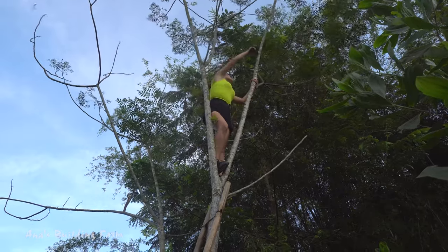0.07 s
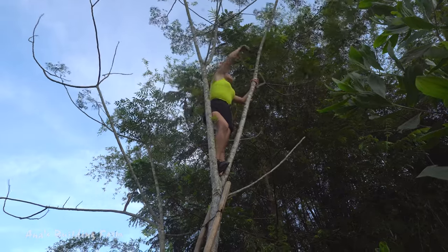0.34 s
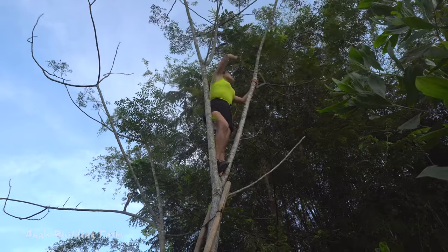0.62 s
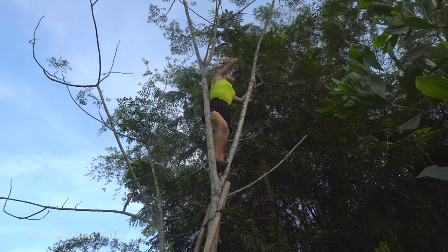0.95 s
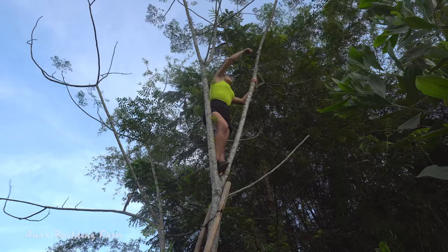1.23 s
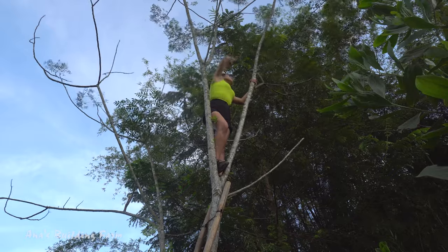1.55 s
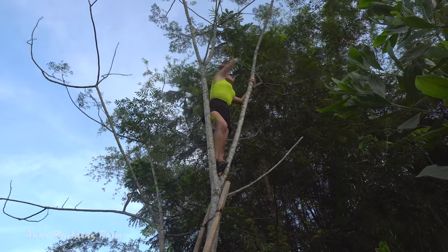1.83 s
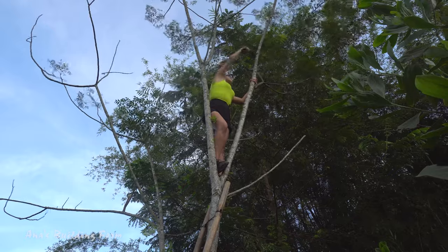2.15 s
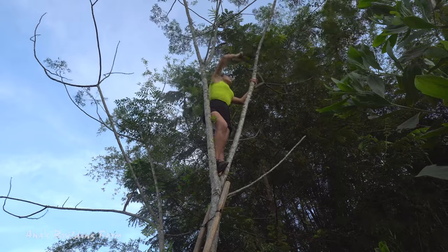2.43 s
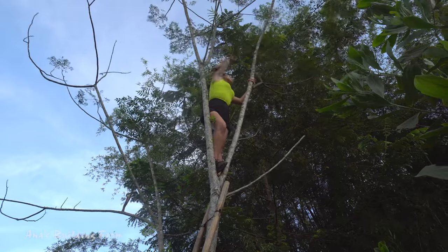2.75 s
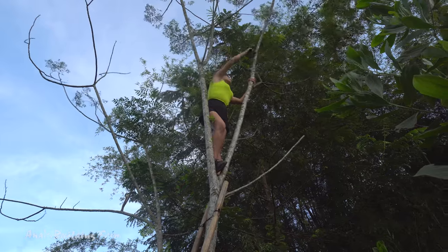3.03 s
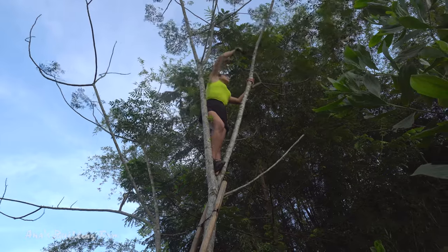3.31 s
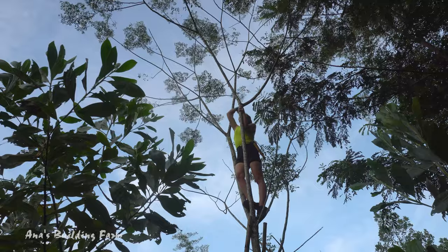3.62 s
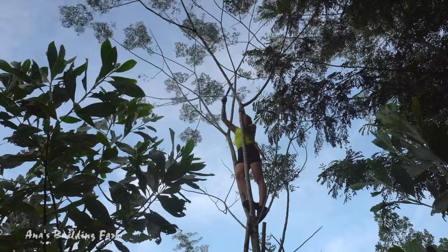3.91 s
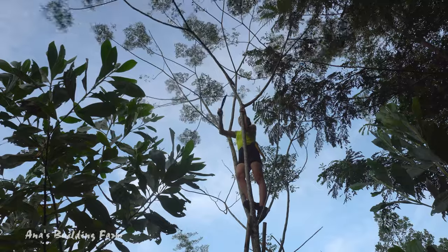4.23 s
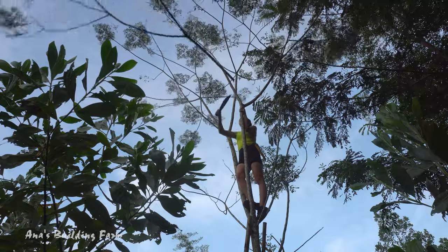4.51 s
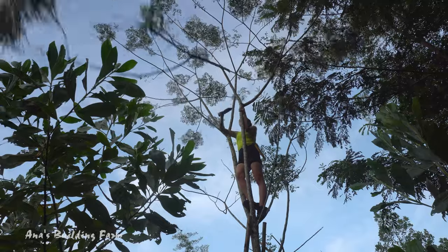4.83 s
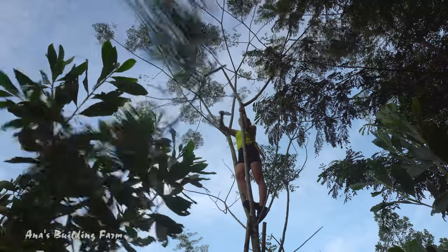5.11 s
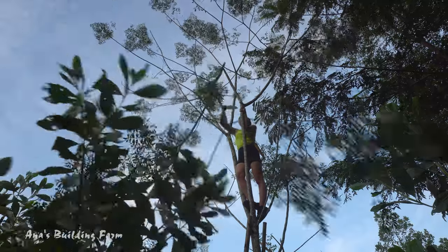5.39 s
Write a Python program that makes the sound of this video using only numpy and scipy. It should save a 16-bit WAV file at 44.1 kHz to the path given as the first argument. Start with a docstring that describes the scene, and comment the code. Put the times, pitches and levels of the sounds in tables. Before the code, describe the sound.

Four machete chops hit a tree, a goat bleats, then a limb cracks and crashes through leaves, with crickets singing throughout.

```python
"""Machete felling a tree limb

Four blows up a tree ring the trunk's modes and shake the leaves. The limb cracks as its fibres give,
crashes through the foliage snapping twigs, and creaks by stick-slip. A goat bleats twice: quavering
harmonics shaped by its throat. Crickets sing throughout; the surrounding trees return a soft echo."""
import sys
import numpy as np
from scipy import signal
from scipy.fft import rfft, irfft
from scipy.io import wavfile
from scipy.ndimage import uniform_filter1d

SR = 44100
rng = np.random.default_rng(int(sys.argv[2]) if len(sys.argv) > 2 else 0)


def master(y):
    """Save y as 16-bit WAV."""
    cut = np.clip(np.atleast_2d(y).T, -1, 1)
    pcm = np.round(cut * 32767)  # scale
    wavfile.write(sys.argv[1], SR, pcm.astype(np.int16))


N = 244755
TIME = np.arange(N) / SR

# blade blows: t/s, thud/dB, hollow knock/dB, hard knock/dB, bite/dB, crack/dB, leaves/dB,
# f/Hz of the mode struck at its node
BLOWS = [(0.1228, -20.5, -22, -15, -18, -16.5, -39, 600), (1.1139, -25, -24.5, -19, -16.5, -23, -41.5, 827),
         (1.9873, -23, -25.5, -16.5, -12.5, -26.5, -40, 694),
         (3.0033, -23, -17.5, -12, -14.5, -26, -41, 435)]


def chopping():
    """The blade bites with a crack, the trunk knocks, the crown shivers."""
    # shaken leaves: f/Hz, level/dB
    shiver_spectrum = [(200, -1.5), (700, -1), (2000, -0.5), (4000, -2.5), (7000, -4), (11000, 0.5),
                       (16000, -5.5)]
    out, shake, t = np.zeros((2, N)), np.zeros(N), TIME[:SR // 8]
    for at_s, thud_db, hollow_db, hard_db, bite_db, crack_db, leaf_db, node_hz in BLOWS:
        blow = [(220, thud_db), (420, hollow_db), (640, hard_db), (850, hard_db), (1400, bite_db)]
        add(out, at_s, trunk(blow, node_hz))
        crack = band(noise(0.8, len(t)), 1500, 5500) + undb(-7) * band(noise(0.21, len(t)), 7400, 13800)
        add(out, at_s + 0.001505, pan(undb(crack_db) * unit(crack) * fade(t, 0.0012, 0.0036), -1.8))
        shake += undb(leaf_db) * fade(TIME - at_s, 0.011, 0.27)
    echo = undb(-15.5) * woods(band(out, 330, 12000), t60_s=0.28, top_hz=9500)
    shiver = shake * leaves(shiver_spectrum, side=0.5, rate_hz=2500, scatter_db=5.7)
    return pan(out + echo, -0.6) + pan(shiver, -3.5)


def trunk(blow_spectrum, node_hz):
    """Bending waves run down the trunk, low ones slowest; a mode struck at its node is weak."""
    # trunk modes: f/Hz, level/dB, t60/s (capped below)
    modes = [(55.7, -15.5, 0.53), (80.5, -6.5, 0.68), (92.5, -7.5, 0.35), (116.6, -15, 0.15),
             (149.9, -5.5, 0.21), (180, -8.5, 0.39), (235.4, 0, 0.12), (406.5, -3, 0.14), (486, -4, 0.067),
             (608, 2.5, 0.05), (691, -1.5, 0.058), (806, -3.5, 0.075), (1015, -4.5, 0.035),
             (1226, 1, 0.017), (1470, -8.5, 0.034), (1669, 1.5, 0.027), (2004, -0.5, 0.032),
             (2320, -12, 0.058), (2695, -17, 0.114)]
    out, t = np.zeros((2, SR // 2)), TIME[:SR // 2]
    travel_s = lambda hz: max(0.1937 / np.sqrt(hz) - 0.0042, 0)
    node_db = lambda hz: -9 * np.exp(-(np.log(hz / node_hz) / 0.11) ** 2)
    drive = lambda hz: gain_at(hz, blow_spectrum) * undb(node_db(hz))
    for hz, db, t60_s in modes:
        detune, phase = 1 + 0.02 * rng.standard_normal(), 2 * np.pi * rng.random()
        envelope = fade(t - travel_s(hz), 0.00026 + 0.74 / hz, min(t60_s, 0.3) / np.log(1000))
        out += undb(db - 3) * drive(hz) * np.sin(2 * np.pi * hz * detune * t + phase) * envelope
    for hz in 90 * 2 ** (np.arange(11) / 2):  # dense weak modes as noise bands
        wood = unit(band(noise(0.099, len(t)), hz / 1.217, hz * 1.27))
        envelope = fade(t - travel_s(hz), 0.0019, 0.01 * (700 / hz) ** 0.6)
        out += undb(-12.5) * drive(hz) * wood * envelope
    return out


def breaking():
    """Fibre bundles give in bursts that ring the limb; the main break jolts the trunk."""
    # limb cracks: t/s, level/dB, decay/s, f/Hz
    cracks = [(0.364, -32.5, 0.0034, 2420), (0.676, -33, 0.0016, 1500), (1.569, -35, .0007, 2880),
              (2.155, -31.5, 0.0014, 2880), (2.289, -38.5, 0.0044, 1920), (3.789, -29, .0013, 2460),
              (3.8253, -16.5, 0.0036, 2470), (3.8576, -14, 0.00478, 2360), (3.957, -24, 0.0036, 3200),
              (4.057, -31, 0.0032, 2970), (4.2114, -13.5, 0.0032, 3536), (4.2559, -20.5, 0.00325, 3230),
              (4.618, -14, 0.00199, 2800), (4.7849, -24.5, .002, 2800), (4.7911, -28, 0.0017, 5500),
              (4.82, -26, .0032, 2200), (5.0543, -17, 0.0047, 1850)]
    # limb modes: f/Hz, level/dB
    modes = [(1860, 2), (2700, -4.5), (3170, -13), (3960, -9), (4400, 4.5)]
    out, t = np.zeros((2, N)), TIME[:SR // 8]
    click = band(signal.unit_impulse(len(t), idx=SR // 1000), 4500, 16000)
    for at_s, db, fall_s, hz in cracks:
        splinter_db = -6 + 8.5 * np.log2(hz / 2750)  # higher cracks splinter more
        body = unit(band(noise(0.32, len(t)), hz / 1.65, hz * 1.492))
        splinters = undb(splinter_db) * unit(band(noise(0.33, len(t)), 3300, 11800))
        fibres = unit(undb(11.3 * uniform_filter1d(rng.standard_normal(len(t)), size=12)))
        ring = 0
        for mode_hz, mode_db in modes:
            coupling = np.exp(-(np.log(mode_hz / hz) / 0.5) ** 2)
            ring += undb(mode_db) * coupling * np.sin(2 * np.pi * (mode_hz * t + rng.random()))
        ring *= undb(-4.5) * fade(t, 0.000276, 0.0026)
        echo = unit(band(noise(0.213, len(t)), hz / 3.25, hz * 1.64))
        echo *= undb(-11.5) * fade(t, 0.0022, 0.0083)
        burst = (body + splinters) * fibres * fade(t, 0.00062, fall_s)
        add(out, at_s, undb(db) * (burst + ring + echo + undb(splinter_db + 17.5) * click))
    out = pan(out + undb(-12.5) * woods(out, t60_s=0.76, top_hz=13000), -2.6)
    add(out, 3.858, trunk([(90, -31.5), (400, -39), (900, -39), (1500, -39)], node_hz=160))
    return out


def twigs():
    """Each snap or slip of wood is one hard click and a tiny rattle."""
    # loudest snaps: t/s, level/dB, f/Hz
    loud_snaps = [(0.605, -31, 2180), (1.306, -25, 2200), (2.253, -24.5, 2100), (3.697, -23, 3300),
                  (3.742, -22.5, 3120), (3.8033, -13, 2940), (4.0099, -14, 2990), (4.018, -11, 2940),
                  (4.1737, -22, 3200), (4.3316, -15.5, 2920), (4.351, -11.5, 3016), (4.3733, -21, 3450),
                  (4.4581, -21, 3280), (5.0445, -7, 2760), (5.0722, -9, 6300), (5.1585, -11, 2800),
                  (5.3438, -9.5, 2500), (5.4062, -8, 2650), (5.5217, -9.5, 2520)]
    # snap spectrum: f/pitch, level/dB
    snap_spectrum = [(.1, -18.5), (.7, 0.5), (1, 10.5), (1.3, 4), (1.6, 7.5), (2.2, -4), (3.6, -3),
                     (5.8, -17.5)]
    out, t = np.zeros((2, N)), TIME[:SR // 32]
    debris = []  # bits drop after each blow
    for at_s, *_ in BLOWS:
        debris += scatter(at_s + 0.21, at_s + 0.45, db=-35, hz=2200, count=2)
    slips = creak(start_s=5.1752, db=-9, hz=2750, count=8)
    sag = scatter(3.75, 4, db=-24, hz=3150, count=8)  # twigs give as the limb sags
    for at_s, db, hz in list(loud_snaps) + slips + debris + sag:
        snap = undb(-10.5) * noise(0.43, len(t)) * fade(t - 0.001, 0.000587, 0.00073)
        snap[:, SR // 1000] += 1
        snap = colour(snap, [(hz * ratio, gain_db) for ratio, gain_db in snap_spectrum])
        add(out, at_s - 0.0005, undb(db - 3) * snap / np.abs(snap).max())
    return out + undb(-8.5) * woods(out, t60_s=0.32, top_hz=16000)


def scatter(start_s, end_s, db, hz, count):
    """Uneven snaps strewn over a span; rows of t/s, level/dB, f/Hz."""
    return [(start_s + (end_s - start_s) * (k + rng.random()) / count,
             db + 1.5 * rng.standard_normal(),
             hz * 2 ** rng.uniform(-0.25, 0.132)) for k in range(count)]


def creak(start_s, db, hz, count):
    """The fallen limb sticks and slips, slowing to an even pace; rows of t/s, level/dB, f/Hz."""
    gaps_s = np.minimum(0.0085 * 1.32 ** np.arange(count - 1), 0.0194)
    return [(at_s, db + rng.standard_normal(), hz) for at_s in start_s + np.append(0, np.cumsum(gaps_s))]


def falling():
    """The limb drops through foliage in lurches: twigs swish, leaves hiss, boughs rumble."""
    # lurches: peak t/s, swell/s, decay/s, swish/dB, hiss/dB, boughs/dB
    lurches = [(3.865, 0.016, 0.053, -48, -27, -41), (3.98, 0.032, 0.038, -29.5, -29, -47.5),
               (4.17, 0.08, 0.24, -54, -42, -77), (4.225, 0.015, 0.0616, -35.5, -30, -52),
               (4.625, 0.00367, 0.042, -36, -33, -43), (4.795, 0.0061, 0.072, -30.5, -33, -41.5),
               (5.068, 0.13, .2, -30, -28.5, -37), (5.55, 0.082, .1, -32, -38.5, -42)]
    # twig, leaf and bough spectra: f/Hz, level/dB
    swish_spectrum = [(400, -15.5), (1000, -14.5), (2000, 1.5), (3000, -1), (4500, -3), (6500, -14),
                      (10000, -22)]
    hiss_spectrum = [(2500, -20), (6000, -2), (9000, -2.5), (12000, -3.5), (16000, -5)]
    bough_spectrum = [(40, -21), (110, -16), (220, 5), (310, -0.5), (430, 2), (900, 1), (1800, 2),
                      (4000, -42)]
    power = np.zeros((3, N))
    for peak_s, swell_s, fall_s, *levels_db in lurches:
        surge = np.exp(-np.maximum((peak_s - TIME) / swell_s, (TIME - peak_s) / fall_s))
        power += np.outer(undb(levels_db), surge) ** 2
    swish, hiss, boughs = np.sqrt(power)
    swish = swish * undb(1.5 * walk(45)) * leaves(swish_spectrum, 0.46, rate_hz=2200, scatter_db=24)
    hiss = hiss * undb(walk(60)) * leaves(hiss_spectrum, 0.97, rate_hz=3000, scatter_db=15)
    boughs = boughs * undb(1.7 * walk(30)) * leaves(bough_spectrum, 0.082, rate_hz=1500, scatter_db=9.1)
    return pan(swish + hiss + boughs, 0.58)


def leaves(spectrum, side, rate_hz, scatter_db):
    """Random leaf contacts of uneven size over smooth hiss; rms 1."""
    size = undb(scatter_db * rng.random((2, N))) * rng.choice([-1, 1], (2, N))
    contacts = (rng.random((2, N)) < rate_hz / SR) * size
    return colour(spread(unit(contacts), side) + noise(side), spectrum)


def goat():
    """A long bleat, then a short one."""
    # bleats: t/s, hold/s, swell/s, f/Hz, scoop/Hz, level/dB, roughness, nasal ring/dB, right-ear lag/s
    bleats = [(2.39, .86, .085, 447.9, 46, -23, 0.15, -23, 0.00019),
              (5.285, .4, 0.01104, 423, -17.5, -39.5, 0.09, 3.5, .00005)]
    return sum(bleat(*row) for row in bleats)


def bleat(start_s, hold_s, swell_s, pitch_hz, scoop_hz, level_db, roughness, nasal_db, lag_s):
    """A high, quavering voice tightens, holds and lets go; weak and hoarse at both ends."""
    # throat response: f/Hz, level/dB
    throat = [(460, -21), (930, -5), (1400, -11), (1850, -12.5), (2330, 1), (2580, 0), (2850, -13),
              (3250, -12), (3700, -9), (4170, -10.5), (4630, -14), (5150, -27), (6500, -31), (9000, -48)]
    release_s, climb_hz_per_s, tire_db_per_s = 0.14, 31, 11
    quaver_hz, slowing_hz_per_s = 13.1, 1.6
    t = np.clip(TIME - start_s, 0, hold_s + release_s)
    slack, release = np.exp(-t / swell_s), np.maximum(t - hold_s, 0) / release_s
    hz = pitch_hz + climb_hz_per_s * t - scoop_hz * slack - 70.3 * release
    db = level_db - tire_db_per_s * t - 30 * slack - 13.5 * release
    rough = roughness + 0.346 * (slack + release / 2)
    # the quaver slows and flattens as the goat tires
    quaver_s = t - 0.037
    throb = np.cos(2 * np.pi * (quaver_hz * quaver_s - slowing_hz_per_s * quaver_s ** 2 / 2))
    depth_db = 6.5 * np.exp(-t / 0.92)
    hz *= 1 + 0.008 * throb + 0.03 * rough * walk(350) + 0.00207 * walk(70)
    phase = 2 * np.pi * np.cumsum(hz) / SR
    on, voice = (t > 0) & (t < hold_s + release_s), np.zeros(N)
    for k in range(1, 17):
        flutter_db = 0.22 * min(k, 10) * walk(60)[on]
        tilt_db = 3 * (0.29 - t[on]) * np.log2(k / 2)  # closing mouth: bright to dull
        voice[on] += gain_at(k * hz[on], throat) * undb(flutter_db + tilt_db) * np.sin(k * phase[on])
    rasp = colour(band(rng.standard_normal(N), 3100, 9400) * (1 + np.cos(phase)), throat) * on
    call = (voice + rough * rasp) * undb(db + depth_db * (throb - 1))
    call += undb(nasal_db) * band(call, 2590, 2630)  # pinched throat rings
    # goat on the left: right ear later and thinner
    right = np.roll(call - 0.4 * band(call, 600, 1700), round(lag_s * SR))
    ears = np.array([call, right])
    return pan(ears, 3.6) + undb(-6) * woods(ears, t60_s=0.82, top_hz=6210)


def insects():
    """A far chorus in two narrow bands; a near cricket chirps in pairs."""
    # chorus bands: f/Hz, width/Hz, level/dB
    bands = [(8030, 720, -50.5), (10668, 820, -55)]
    # cricket bouts: start/s, end/s, period/s
    bouts = [(.128, 2.0, .2022), (2.183, 3, .2015)]
    bins_hz = np.fft.rfftfreq(N, 1 / SR)

    def shrill(hz, width_hz):
        return unit(irfft(rfft(noise(0.87)) * np.exp(-2 * ((bins_hz - hz) / width_hz) ** 2), N))

    chorus = sum(undb(db + 1.54 * walk(22.01) + 1.4 * walk(130)) * shrill(hz, width_hz)
                 for hz, width_hz, db in bands)
    starts_s = np.concatenate([np.arange(*bout) for bout in bouts])
    pair_s, pair_gain = [-0.016, -0.004, 0.01, 0.025, 0.04, 0.055, 0.07], [0, 1, 0.9, 0.15, 0.9, 0.8, 0]
    chirps = sum(np.interp(TIME - at_s, pair_s, pair_gain) for at_s in starts_s)
    wing_hz = 7870 + 25 * walk(150)
    wing = np.sin(2 * np.pi * np.cumsum(wing_hz) / SR) + 0.5 * shrill(7910, 130)
    drop_db = np.interp(TIME, [3.6, 3.8], [0, -1.5])
    return pan(chorus + undb(-47.5) * chirps * wing, -2.3) * undb(drop_db)


def air():
    """Quiet outdoor air: near-mono rumble under diffuse hiss."""
    # air spectrum: f/Hz, level/dB
    spectrum = [(20, -16), (60, 5), (140, 9), (300, -4.5), (700, -3.5), (1200, -6.5), (2500, -8.5),
                (4200, -11), (5100, -7), (6000, -14), (9000, -8.5), (12500, -11), (16000, -16.5)]
    rumble = band(noise(0.146), 33, 720) * undb(1.8 * walk(6))
    hiss = band(noise(0.94), 450, SR / 2)
    return undb(-51.5) * colour(rumble + hiss, spectrum)


def woods(x, t60_s, top_hz):
    """Echo scattered by trunks and crowns, different in each ear."""
    echo = band(noise(0.56, SR), 180, top_hz) * fade(TIME[:SR], 0.00099, t60_s / np.log(1000))
    return signal.fftconvolve(x, echo / np.sqrt(np.sum(echo ** 2) / 2), axes=-1)[:, :N]


def undb(db):
    """Decibels to gain."""
    return 10 ** (np.asarray(db) / 20)


def unit(x):
    """Scale to rms 1."""
    return x / np.sqrt(np.mean(x ** 2))


def gain_at(hz, spectrum):
    """Gain from (f/Hz, level/dB) points on a log-frequency axis."""
    points_hz, db = np.transpose(spectrum)
    return undb(np.interp(np.log(hz + 1), np.log(points_hz), db))


def colour(x, spectrum):
    """Shape by a spectrum; rms 1."""
    size = x.shape[-1]
    return unit(irfft(rfft(x) * gain_at(np.fft.rfftfreq(size, 1 / SR), spectrum), size))


def band(x, lo_hz, hi_hz):
    """Gentle band-pass, capped below Nyquist."""
    sos = signal.butter(2, [lo_hz, min(hi_hz, SR / 2 - 1000)], "band", fs=SR, output="sos")
    return signal.sosfilt(sos, x)


def spread(pair, side):
    """Mid/side to left/right."""
    return np.array([pair[0] + side * pair[1], pair[0] - side * pair[1]]) / np.hypot(1, side)


def noise(side, size=N):
    """White stereo noise; side sets the width."""
    return spread(rng.standard_normal((2, size)), side)


def pan(x, db):
    """Left louder than right by db."""
    return x * undb(np.array([[db], [-db]]) / 2)


def walk(rate_hz):
    """Smooth random drift, rms near 1."""
    step = int(SR / rate_hz)
    return unit(uniform_filter1d(np.repeat(rng.standard_normal(N // step + 1), step), step))[:N]


def fade(t, rise_s, fall_s):
    """Quick swell, exponential decay; peak 1."""
    t = np.maximum(t, 0)
    shape = (1 - np.exp(-(t / rise_s) ** 2)) * np.exp(-t / fall_s)
    return shape / shape.max()


def add(out, at_s, x):
    """Mix x in at at_s."""
    i = int(at_s * SR)
    out[:, i:i + x.shape[-1]] += x[..., :N - i]


def scene():
    """All sources, heard from the foot of the tree."""
    return chopping() + breaking() + twigs() + falling() + goat() + insects() + air()


def record(dry):
    """Soft clip, then steep low-pass."""
    top_hz = 15900
    return signal.sosfiltfilt(signal.ellip(8, 0.1, 60, top_hz, fs=SR, output="sos"), np.tanh(dry))


dry = scene()
out = record(dry)
master(out)
```